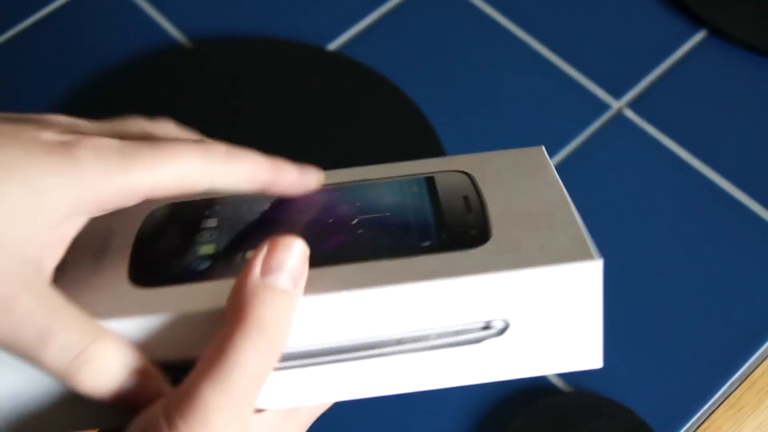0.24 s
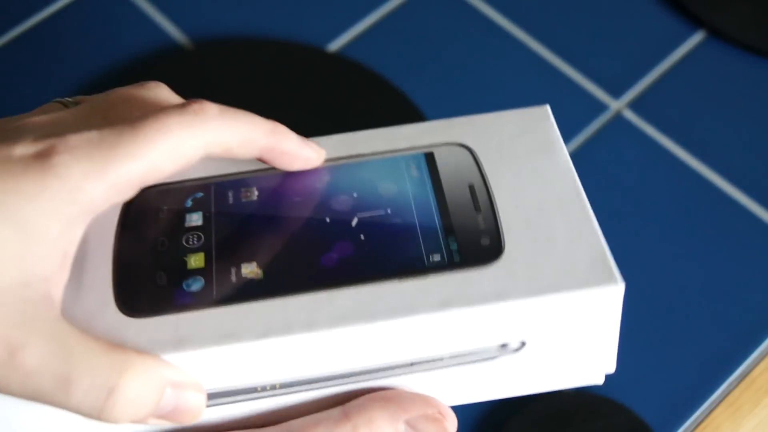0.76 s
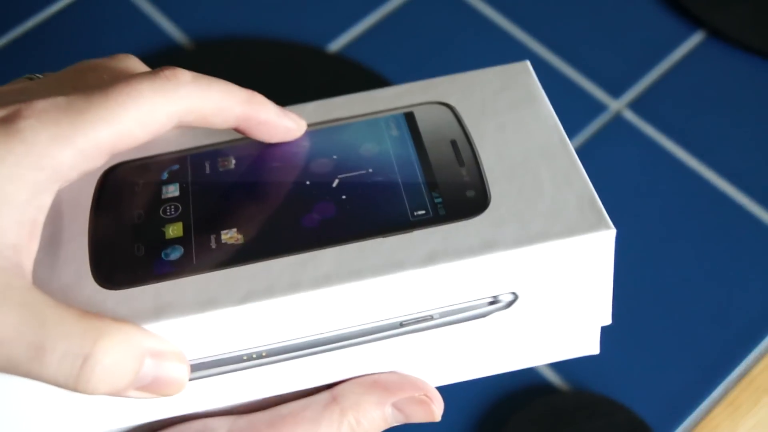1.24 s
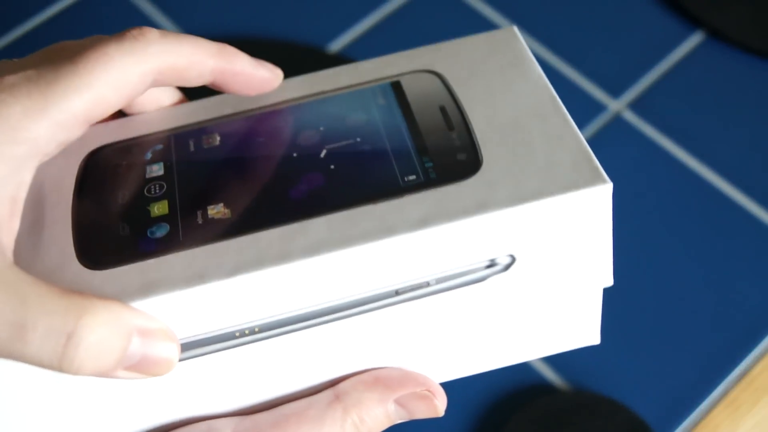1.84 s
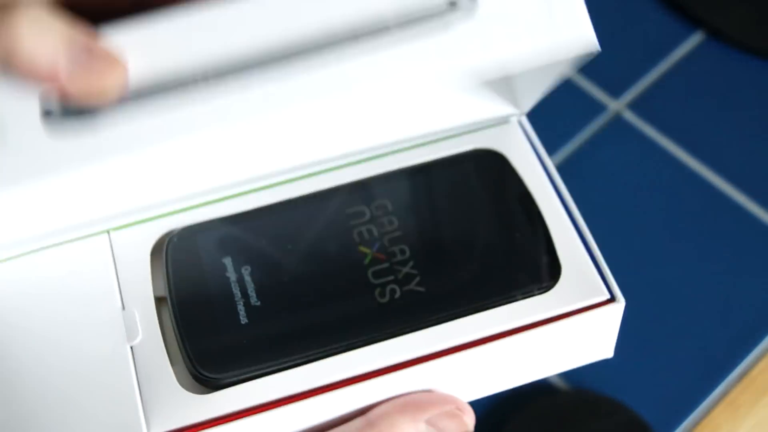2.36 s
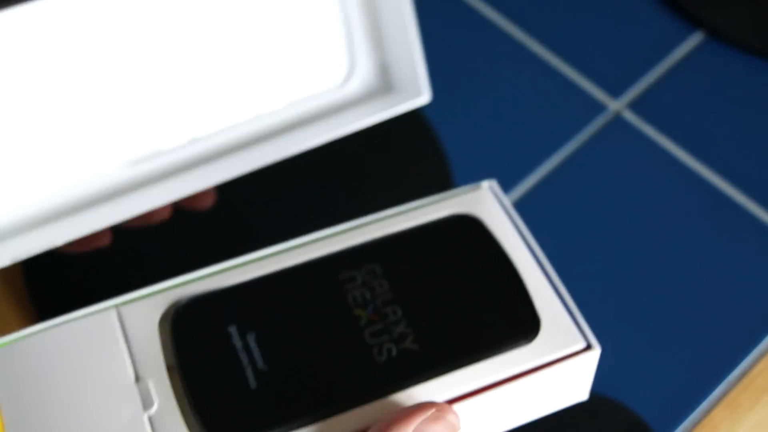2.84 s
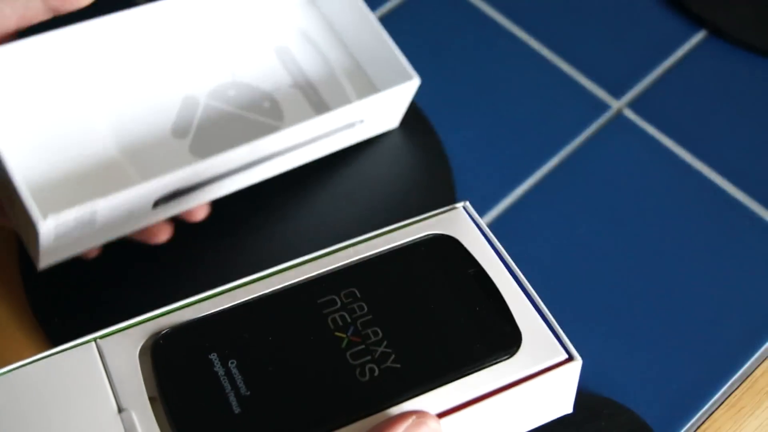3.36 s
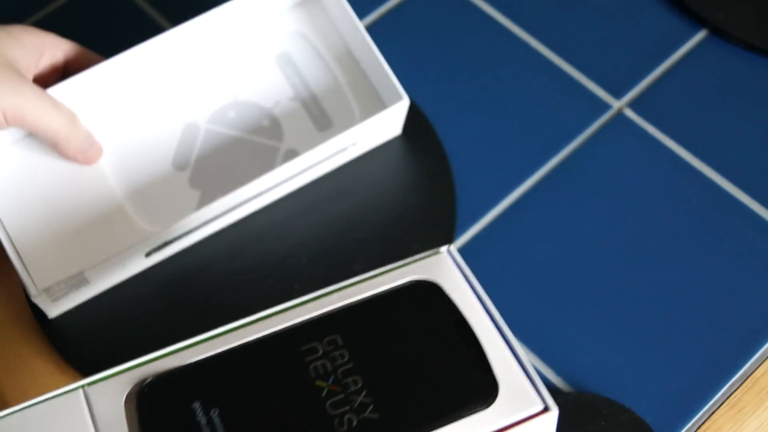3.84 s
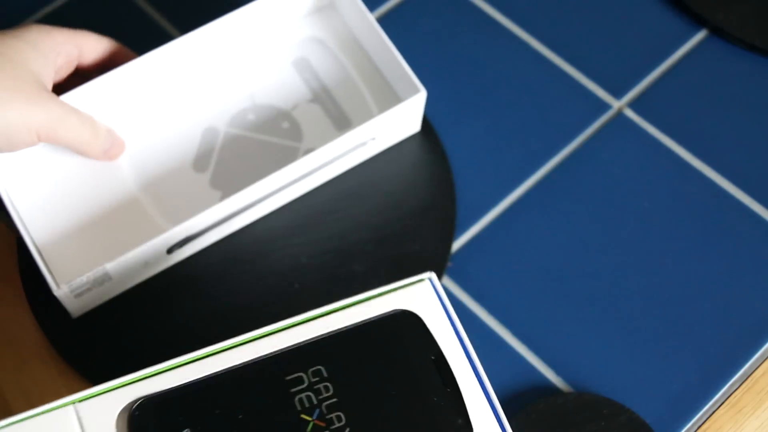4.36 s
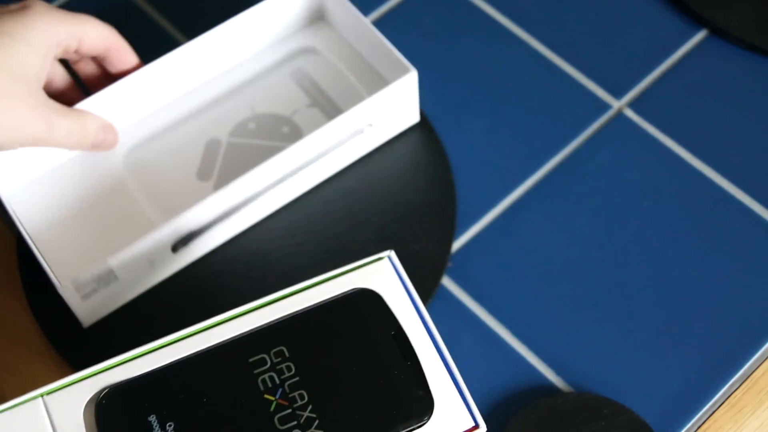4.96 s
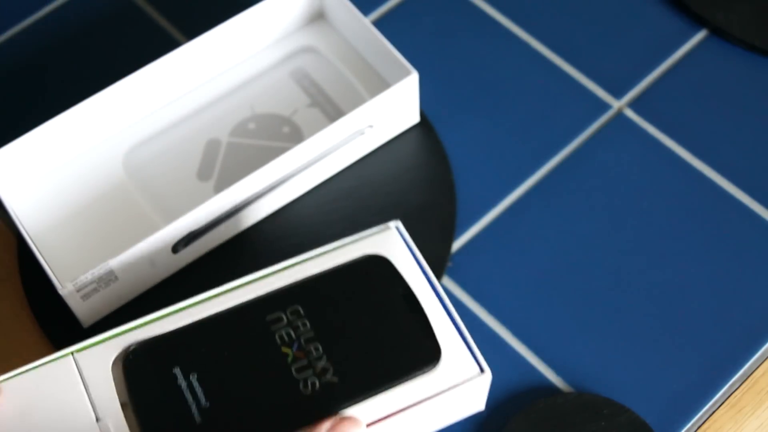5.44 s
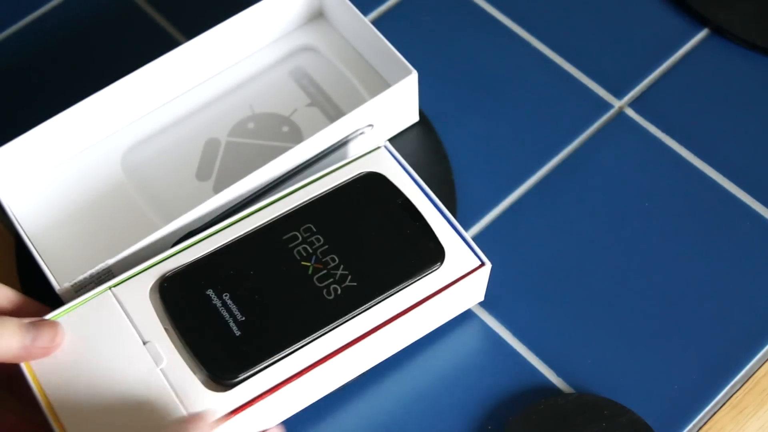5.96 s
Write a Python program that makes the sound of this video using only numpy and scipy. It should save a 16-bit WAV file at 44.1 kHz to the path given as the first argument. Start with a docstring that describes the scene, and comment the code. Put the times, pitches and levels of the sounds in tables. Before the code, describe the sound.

Hands shift a small cardboard box in a quiet room, slide off its lid with soft scrapes, and knock it down hollowly on a mat.

```python
"""A quiet room, at a desk mat close to a camera: hands turn a small cardboard box, slide its lid off and set it down.
Knocks are sums of damped modes under a noise crack; rubs, scrapes and scratches are coloured, grainy noise.
Ticks are decaying sines in band noise, and the air in the lid hums as gliding sines. Steady air noise with
a thin tone lies beneath, and a decaying noise tail answers the hands.
The camera's housing cuts the bass and notches the middle; its amplifier adds rumble."""
import sys
import numpy as np
from scipy import signal
from scipy.fft import rfft, irfft, next_fast_len
from scipy.io import wavfile
from scipy.ndimage import uniform_filter1d, map_coordinates

SR = 44100
rng = np.random.default_rng(int(sys.argv[2]) if len(sys.argv) > 2 else 0)


def inscribe(sig):
    """Save sig as 16-bit PCM at rate SR to the path in sys.argv[1].

    A 1-D sig is mono; a 2-D sig holds one channel per row.
    Samples are clipped to [-1, 1] before scaling.
    """
    pcm = np.round(np.clip(np.atleast_2d(sig).T, -1, 1) * 32767)
    wavfile.write(sys.argv[1], SR, pcm.astype(np.int16))


N = 273278

# Left-right correlation of the hand sounds and of the room's answer: f/Hz, likeness (1 = identical)
HAND_ALIKE = [(250, 0.99), (700, 0.53), (1500, 0.47), (4000, 0.024), (14000, 0.038)]


def amp(db):
    """Level to amplitude ratio: 20 dB is a factor of ten."""
    return 10 ** (np.asarray(db) / 20)


def unit(x):
    """Normalisation to a root-mean-square of 1."""
    return x / np.sqrt(np.mean(x ** 2) + 1e-20)


def along(points, hz):
    """Linear interpolation of (f/Hz, value) points on a logarithmic frequency axis."""
    f, value = np.transpose(points)
    return np.interp(np.log(hz + 1), np.log(f + 1), value)


def filtered(x, response):
    """Linear filtering: the spectrum of x times a complex frequency response."""
    n = x.shape[-1]
    padded = next_fast_len(n + 8192)
    spectrum = rfft(x, padded) * response(np.fft.rfftfreq(padded, 1 / SR))
    return irfft(spectrum, padded)[..., :n]


def peak(f, hz, width):
    """Damped resonance: a causal second-order response of gain 1 at its centre."""
    return 1j * f * width / (hz * hz - f * f + 1j * f * width)


def wobble(rate):
    """Slow random modulation: a spline through rate normal random knots a second."""
    knots = rng.standard_normal(int(N * rate / SR) + 4)
    return map_coordinates(knots, [np.arange(N) * rate / SR])


def rush(colour, alike, grain_db, rate):
    """Partly correlated stereo noise of rms 1: the mid-side balance at each frequency sets the likeness."""
    pair = rng.standard_normal((2, N)) * amp(grain_db * wobble(rate))

    def mid_side(hz):
        angle = np.arccos(np.clip(along(alike, hz), -1, 1)) / 2
        return colour(hz) * [np.cos(angle), np.sin(angle)]

    mid, side = filtered(pair, mid_side)
    return unit(np.array([mid + side, mid - side]))


def stroke(start, length, rise, fall):
    """Trapezoidal envelope of height 1 that rises and falls over the given shares of its length."""
    u = (np.arange(N) / SR - start) / length
    return np.clip(np.minimum(u / rise, (1 - u) / fall), 0, 1)


def placed(x, pan_db):
    """Stereo localisation: a level difference, and an earlier arrival on the left."""
    left_leads_s = .00006  # the hands work left of the camera
    side = np.array([[.5], [-.5]])
    return filtered(x, lambda f: amp(pan_db * side) * np.exp(2j * np.pi * f * left_leads_s * side))


def walls(x):
    """Reverberation: convolution with a fresh noise tail whose decay time depends on frequency."""
    # Reverberation time: f/Hz, t60/s
    room_t60 = [(250, 0.21), (600, 0.25), (1500, 0.33), (4000, 0.42), (12000, 0.33)]
    hz, t, z = signal.stft(rng.standard_normal((2, SR // 2)), SR, nperseg=256)
    share = np.clip(along(HAND_ALIKE, hz), 0, 1)[:, None]
    z[1] = share * z[0] + np.sqrt(1 - share ** 2) * z[1]  # most alike in the bass
    decay = amp(-60 * t / along(room_t60, hz)[:, None])
    tail = signal.istft(z * decay, SR, nperseg=256)[1]
    delayed = np.pad(x, (250, 0))  # samples before the answer begins
    return signal.fftconvolve(delayed[None], tail / np.linalg.norm(tail[0]), axes=1)


def room_tone():
    """Stationary broadband noise: coloured air noise, slowly drifting in level, with one thin tone in it."""
    # Spectrum of the air noise, relative power density: f/Hz, level/dB per Hz
    air_colour = [(140, 3), (220, -0.5), (400, 3.5), (900, 6), (1200, 4.5), (1900, 2), (3000, -2),
                  (4200, -1), (6000, -7.5), (9000, -13), (14000, -19.5)]
    # Left-right correlation of the air noise: f/Hz, likeness
    air_alike = [(130, 0.64), (290, 0.34), (620, 0.31), (1400, 0.21), (3000, 0.025), (14000, .01)]
    # Faint tone of steady level: f/Hz, rms level/dB
    hz, tone_db = (1576, -75)
    drift_db = .8 * wobble(3)
    noise = rush(lambda f: amp(along(air_colour, f)), air_alike, grain_db=0.8, rate=40)
    air = amp(-58.5 + drift_db) * noise
    phase = 2 * np.pi * hz * np.arange(N) / SR + 0.4 * wobble(6)
    tone = np.sqrt(2) * amp(tone_db) * np.sin(phase)
    return (air + tone) * amp([[.8], [-.8]])  # slightly louder on the left


def scratches():
    """Granular friction: grainy noise in the lower treble under each stroke's envelope."""
    # Bright gritty scratches: start t/s, length t/s, level/dB
    strokes = [(0.448, 0.025, -52), (3.442, 0.033, -50), (3.72, 0.085, -49.5), (5.84, 0.088, -51),
               (5.963, 0.068, -64)]
    # Spectrum of the grit, relative power density: f/Hz, level/dB per Hz
    grit_colour = [(2000, -20), (2800, 7), (3700, 4), (4800, -2.5), (6500, -26), (9000, -43)]
    gain = sum(amp(db) * stroke(start, length, 0.25, 0.35) for start, length, db in strokes)
    grit = rush(lambda f: amp(along(grit_colour, f)), HAND_ALIKE, grain_db=2.0, rate=350)
    direct = gain * grit
    return direct + amp(-18.0) * walls(direct[0])[:, :N]


def ticks():
    """Short transients: a fast-decaying sine at the centre frequency within one broad band of noise."""
    # Short ticks, alone or on the front of a knock, with a faint room answer:
    # t/s, level/dB, centre f/Hz, left-right level/dB
    snaps = [(.057, -54, 10000, 5), (0.1, -42, 8700, 15), (0.407, -44, 3780, 15), (0.422, -33.5, 3540, 10),
             (0.711, -44, 5050, 12), (.817, -40, 3400, 9), (.817, -33, 1270, 9), (1.284, -32, 3270, -1),
             (3.323, -37, 7760, 12.5), (4.502, -43, 1250, 12), (4.691, -55, 12500, 7),
             (5.603, -41, 1060, 8), (5.622, -43, 1080, 6), (5.64, -44.5, 1980, 9), (5.955, -51, 2000, 8),
             (6.077, -43, 3520, 12)]
    t60_s, width_share = 0.017, 0.72  # bandwidth as a share of the centre frequency
    out, t = np.zeros((2, N + SR)), np.arange(SR // 20) / SR
    onset = 1 - np.exp(-t / 0.00092)
    for s, db, hz, pan_db in snaps:
        noise = rng.standard_normal(len(t))
        puff = filtered(noise, lambda f: peak(f, hz, width_share * hz) ** 2)
        source = 0.86 * unit(puff) + np.sin(2 * np.pi * hz * t)
        direct = amp(db - 60 * t / t60_s) * source * onset
        total = amp(-11.5) * walls(direct)
        total[:, :len(t)] += direct
        out[:, round(s * SR):][:, :total.shape[1]] += placed(total, pan_db)
    return out[:, :N]


def hums():
    """Cavity resonance: the air in the lid sounds its lowest note, unsteady, while the push lasts."""
    # Lid sliding off the box or over the mat: start t/s, length t/s, first f/Hz, last f/Hz,
    # rms level/dB about which each hum wavers
    slides = [(1.067, 0.16, 420, 416, -71.5), (1.41, 0.21, 409, 422, -67.5), (1.72, 0.16, 424.4, 407, -69),
              (3.352, 0.06, 401, 440, -47.5), (3.425, 0.012, 391, 430, -42), (3.447, 0.044, 480, 443, -48),
              (3.724, 0.039, 413, 406, -24.5), (3.885, 0.16, 409, 419, -59.5)]
    t, note = np.arange(N) / SR, 0
    for start, length, first_hz, last_hz, db in slides:
        glide_hz = np.interp(t, [start, start + length], [first_hz, last_hz])
        turns = np.cumsum(glide_hz) / SR + 0.075 * wobble(63)
        gain = amp(db + 2.2 * wobble(70)) * stroke(start, length, 0.078, 0.13)
        note = note + gain * np.sqrt(2) * np.sin(2 * np.pi * turns)
    return (note + amp(-9.0) * walls(note)[:, :N]) * amp([[1.9], [-1.9]])


def rub_power():
    """Incoherent addition: powers of drag, rasp and hiss sum over shifting hands, scrapes and swipes."""
    # Hands shifting on the box, one long rub: t/s, rasp level/dB
    handling = [(0, -38), (.05, -48.5), (.12, -47), (.24, -55), (.5, -66), (.8, -65.5), (2.0, -66),
                (2.7, -87), (3.3, -80), (4.7, -77), (4.95, -69.5), (5.8, -79), (6.2, -66)]
    # Card scraping on card or mat: start t/s, length t/s, drag level/dB, rasp level/dB
    scrapes = [(0.45, 0.022, -60, -57), (1.302, 0.03, -67, -54.5), (1.97, 0.17, -59.5, -59),
               (2.05, 0.13, -55.5, -60), (3.327, 0.19, -56.5, -61), (3.438, 0.045, -52, -55.5),
               (3.515, 0.25, -66, -56), (3.715, 0.14, -40.5, -61), (3.86, 0.25, -58, -61),
               (4.976, 0.076, -43, -47), (5.467, 0.052, -58, -72), (5.597, 0.1, -67, -64.5),
               (5.76, 0.082, -64, -66), (5.818, 0.16, -55.5, -58.5), (5.933, 0.13, -59, -58)]
    # Fingertips swiping over the card: start t/s, length t/s, skin hiss level/dB
    swipes = [(.14, 0.45, -67), (1.46, 0.081, -70), (2.066, .12, -65), (2.408, .18, -65),
              (2.728, 0.053, -71), (3.506, 0.2, -67), (4.018, 0.19, -71), (5.467, 0.076, -61),
              (5.8, 0.29, -66)]
    hand_db = np.interp(np.arange(N) / SR, *np.transpose(handling))
    drag_db = -61 + 0.42 * (hand_db + 57.5)  # -61 dB at a rasp of -57.5 dB
    hiss_db = hand_db - 13
    power = amp([drag_db, hand_db, hiss_db]) ** 2
    for start, length, *db in scrapes:
        power[:2] += np.outer(amp(db) ** 2, stroke(start, length, 0.21, 0.65) ** 2)
    for start, length, db in swipes:
        rasp_and_hiss_db = [db + 1.5, db]
        power[1:] += np.outer(amp(rasp_and_hiss_db) ** 2, stroke(start, length, 0.14, 0.61) ** 2)
    return power


def rubbing():
    """Friction-driven noise: card drags on card into the hollow body, fibres rasp and dry skin hisses."""
    # Hollow-body resonances that the drag excites: f/Hz, width/Hz, level/dB
    body = [(282.4, 43, -5), (420, 66, 0.5), (804, 810, -3), (1074, 594, -2)]
    # Spectrum of the fibre rasp, relative power density: f/Hz, level/dB per Hz
    rasp_colour = [(800, -32), (1500, -3), (2200, -1), (3000, -4.5), (4500, -6), (6500, -15.5),
                   (10000, -31)]
    # Spectrum of the skin hiss, relative power density: f/Hz, level/dB per Hz
    skin_colour = [(3000, -20), (6000, 0.5), (9000, -1.5), (11500, -3), (14000, -9)]

    def hollow(f):
        # neighbouring resonances alternate in sign
        return sum((-1) ** k * amp(db) * peak(f, hz, width) for k, (hz, width, db) in enumerate(body))

    drag = rush(hollow, HAND_ALIKE, grain_db=2.0, rate=60)
    rasp = rush(lambda f: amp(along(rasp_colour, f)), HAND_ALIKE, grain_db=1.5, rate=850)
    hiss = rush(lambda f: amp(along(skin_colour, f)), HAND_ALIKE, grain_db=1.5, rate=380)
    clumps = amp(1.3 * wobble(35))  # the skin sticks and slips, so each rub comes in clumps
    gain = np.sqrt(rub_power()) * clumps
    direct = gain[0] * drag + gain[1] * rasp + gain[2] * hiss
    return (direct + amp(-6.5) * walls(direct[0])[:, :N]) * amp([[.8], [-.8]])


def knocks():
    """Modal synthesis: a contact rings damped air-cavity, panel and edge modes, with a short noise crack."""
    # Contacts: t/s, cavity level/dB, panel level/dB, crack level/dB, damping factor of the grip
    contacts = [(0.056, -53, -46.5, -37, 1.05), (0.075, -48.5, -54, -45, 0.53),
                (0.107, -36, -27.5, -27, 2.2), (0.205, -50.5, -48.5, -50, 0.83),
                (0.424, -40, -26.5, -32, 2.17), (0.466, -46, -69, -49, 1.2), (0.818, -35, -31, -53, 4.9),
                (1.282, -40, -30, -36.5, 1.84), (1.322, -46.5, -63, -68, 1.16), (2.077, -45, -45, -61, 1.3),
                (2.109, -71, -35, -55, 1.36), (2.324, -46.5, -45.5, -52.5, 1.13),
                (2.406, -38, -21.5, -37.5, 1.64), (2.451, -61, -47, -46.5, 2.2),
                (2.862, -46, -38.5, -48.5, 2.14), (3.313, -19, -24.5, -30.5, 4.23),
                (3.32, -32.5, -39, -30, 2.5), (3.355, -25, -50, -60, 10), (3.41, -32.5, -58, -46, 2.4),
                (3.709, -42, -57, -52, 0.93), (3.721, -22, -17.5, -29, 1.32),
                (3.854, -34, -42.5, -63, 1.36), (4.248, -19.5, -26, -30.5, 1.75),
                (4.265, -32, -32, -60, 1.5), (4.439, -31.5, -40, -64, 1.44), (4.503, -46, -42, -64, 6.3),
                (4.987, -41.5, -33.5, -31.5, 3.1), (5.01, -45, -45, -58, 3),
                (5.03, -49.5, -46, -45.5, 1.07), (5.754, -53, -42.5, -75, 2.5), (5.841, -47, -50, -53, 1.7),
                (5.887, -61, -47.5, -62, 0.87), (5.896, -39, -38.5, -69, 1.08),
                (6.12, -57, -50.5, -57, 1.5)]
    # Span while the hand works on the lid: start t/s, end t/s
    lid_from, lid_to = (3.3, 5.2)
    # Modes of the box in the hands: f/Hz, relative level/dB, t60/s at a damping factor of 1
    box_modes = [(302, -13, 0.043), (336.5, -4, 0.066), (464, 6.5, 0.043), (536, 4.5, 0.048),
                 (754, 3.5, 0.029), (886, 4, 0.035), (1200, -2.5, 0.035), (1653, 4, 0.031),
                 (2015, 14.5, 0.0097)]
    # Modes of the lid on the mat: f/Hz, relative level/dB, t60/s at a damping factor of 1
    lid_modes = [(308.2, -24, 0.39), (394, -2, 0.16), (443.4, -2, 0.15), (490.4, -13, 0.24),
                 (720, -2.5, 0.13), (775, -2.5, 0.081), (892, -1.5, 0.044), (1087.6, -1, 0.11),
                 (1216, 5, 0.054), (1490, 16.5, 0.019), (1594, -3.5, 0.044), (1796, -3.5, 0.11),
                 (1864, 3, 0.026), (1964, -1, 0.045), (2120, 2.5, 0.031), (2963, -2, 0.033)]
    # Spectrum of the crack before its tilt, relative power density: f/Hz, level/dB per Hz
    crack_colour = [(1600, -42), (2600, 1.5), (4500, 0), (6500, -4.5), (14000, -10.5)]
    out, t = np.zeros((2, N + 2 * SR)), np.arange(SR // 4) / SR
    for s, cavity_db, panel_db, crack_db, damping in contacts:
        on_lid = lid_from < s < lid_to
        hz, mode_db, t60 = np.transpose(lid_modes if on_lid else box_modes)[..., None]
        fade_db = -60 * t * np.clip(damping, .2, 8)

        # Edge level is set from panel and crack levels; fingers mute the box's edges
        edge_db = panel_db + 0.41 * (crack_db - panel_db) + (1 if on_lid else -3.5)
        blow_db = np.where(hz < 600, cavity_db, np.where(hz < 1400, panel_db, edge_db))
        luck_db = rng.normal(0, 1.5, hz.shape)
        # Random level flutter roughens every mode as it dies
        flutter = unit(uniform_filter1d(rng.standard_normal((len(hz), len(t))), size=170))
        flutter_db = 3.5 * flutter * np.tanh(t / .02)
        # Random phase in radians, growing with frequency, blurs the upper modes
        blur = unit(uniform_filter1d(rng.standard_normal((len(hz), len(t))), size=260))
        wander = hz / 1500 * blur * np.tanh(t / .01)
        detune = rng.normal(1, 0.012, hz.shape)  # small random detuning, so no two knocks ring quite alike
        level_db = blow_db + mode_db + luck_db + flutter_db + fade_db / t60
        modes = amp(level_db) * np.sin(2 * np.pi * hz * t * detune + wander)
        ring = modes.sum(0) * (1 - np.exp(-t / 0.0022))

        # The crack tilts down more for a dull knock (body over crack) and a forceful one (body over -29 dB)
        dull_db = max(cavity_db, panel_db) - crack_db
        slope_db = -18 - 1.7 * dull_db - 1.3 * (crack_db + dull_db + 29)
        tilt_db = min(slope_db, -20)  # reached at 14 kHz
        noise = rng.standard_normal(len(t))
        puff = filtered(noise, lambda f: amp(along(crack_colour, f) + tilt_db * np.log2(1 + f / 14000)))
        crack = amp(crack_db + fade_db / 0.051) * unit(puff) * (1 - np.exp(-t / 0.0011))

        total = amp(-2.0) * walls(ring + amp(-2.5) * crack)
        total[:, :len(t)] += ring + crack
        pan_db = 3.5 if on_lid else 5
        out[:, round(s * SR):][:, :total.shape[1]] += placed(total, pan_db)
    return out[:, :N]


def scene():
    """Superposition: every sound that reaches the camera adds linearly."""
    return room_tone() + scratches() + ticks() + hums() + rubbing() + knocks()


def record(dry):
    """Filtering and weak nonlinearity: notches, bass cut, lopsided gain, rumble, band limit and offset."""
    # Camera-housing notches: f/Hz, width/Hz, depth of each alone as a level/dB
    housing = [(613, 91, -10), (1386, 407, -12), (2383, 487, -58), (3434, 486, -14)]
    # Spectrum of the amplifier noise, relative power density: f/Hz, level/dB per Hz
    rumble_colour = [(5, 4.5), (30, 1.5), (60, -1.5), (100, -8), (125, -9), (200, -65)]
    # Left-right correlation of the amplifier noise: f/Hz, likeness
    rumble_alike = [(50, .7)]

    def notches(f):
        return np.prod([1 - (1 - amp(db)) * peak(f, hz, width) for hz, width, db in housing], axis=0)

    bass_cut = signal.butter(8, 195, "high", fs=SR, output="sos")
    heard = signal.sosfilt(bass_cut, filtered(dry, notches))
    heard = heard + 0.1 * heard ** 2  # a slightly lopsided amplifier thumps under loud knocks
    noise = rush(lambda f: amp(along(rumble_colour, f)), rumble_alike, grain_db=2.5, rate=8)
    rumble = amp(-81.5) * noise
    top_hz, offset = 14050, -.00253  # offset as a share of full scale
    return filtered(heard + rumble, lambda f: f < top_hz) + offset


dry = scene()
out = record(dry)
inscribe(out)
```